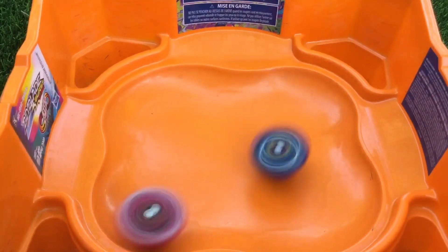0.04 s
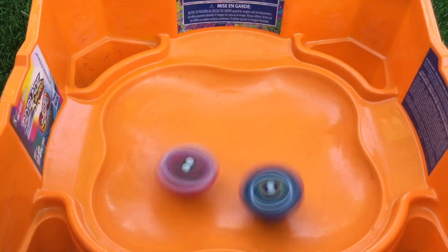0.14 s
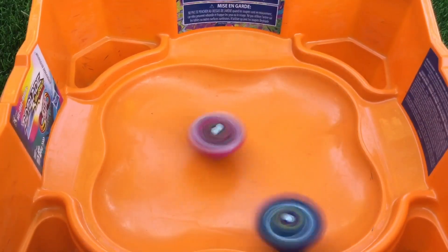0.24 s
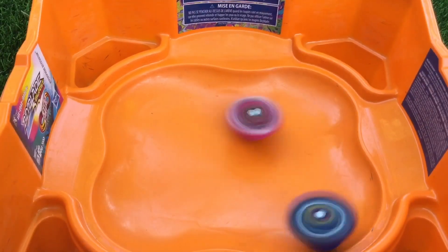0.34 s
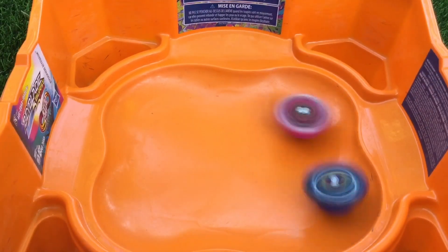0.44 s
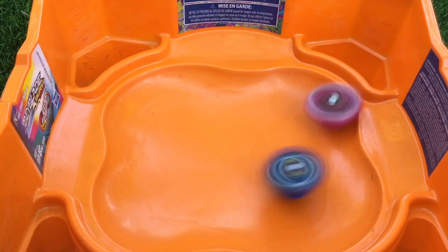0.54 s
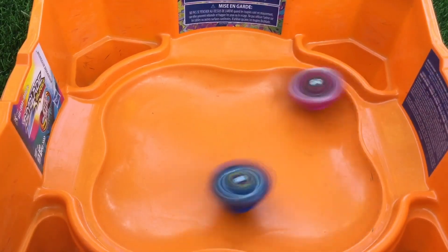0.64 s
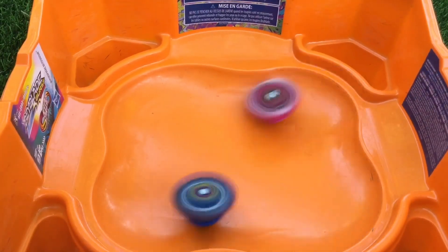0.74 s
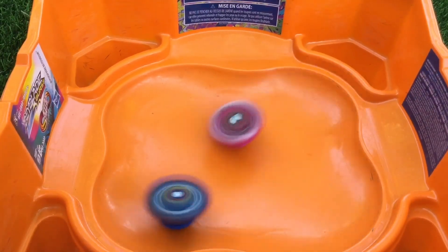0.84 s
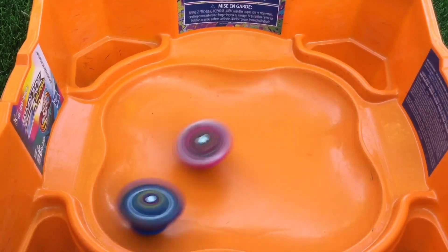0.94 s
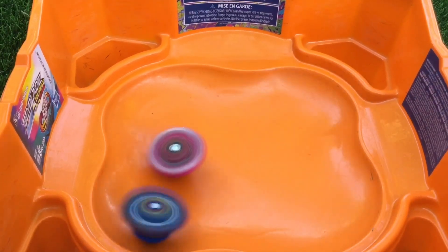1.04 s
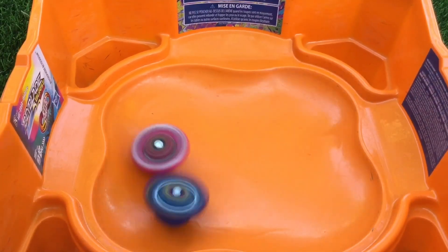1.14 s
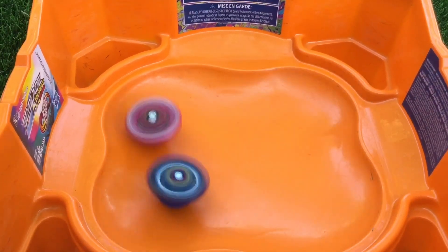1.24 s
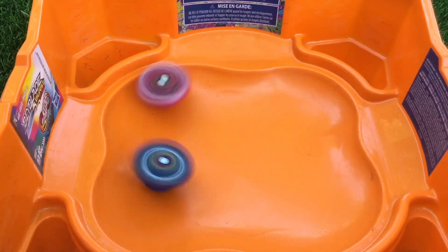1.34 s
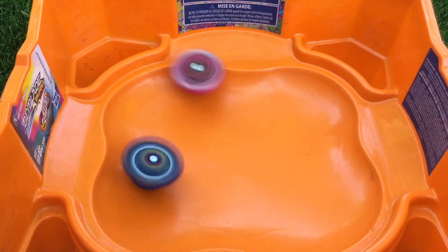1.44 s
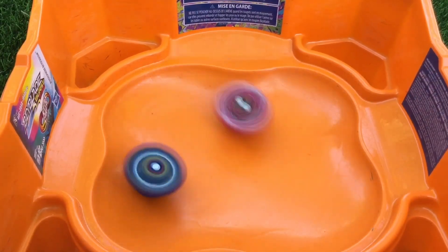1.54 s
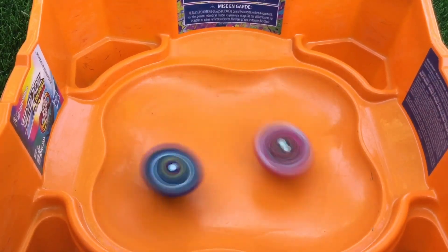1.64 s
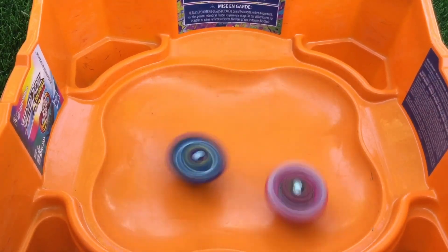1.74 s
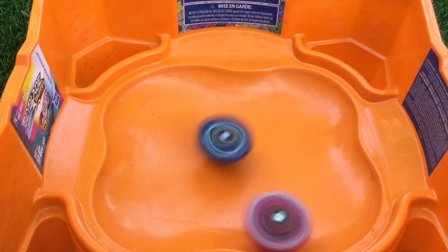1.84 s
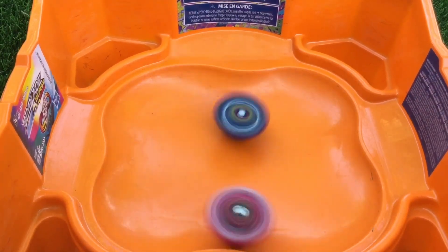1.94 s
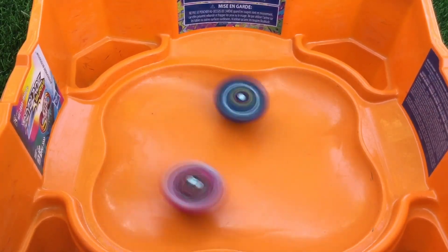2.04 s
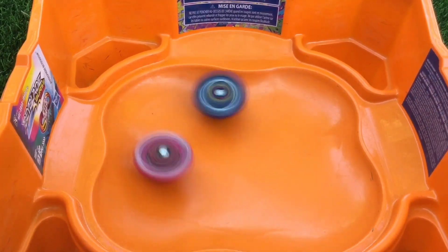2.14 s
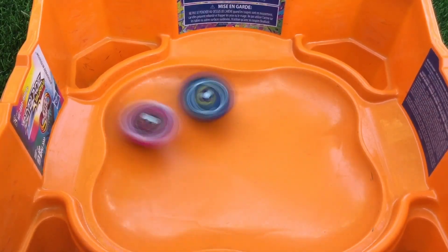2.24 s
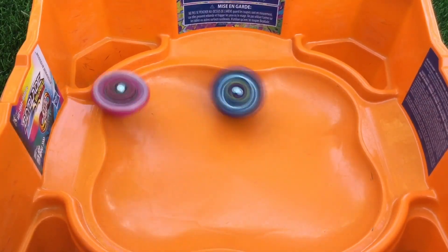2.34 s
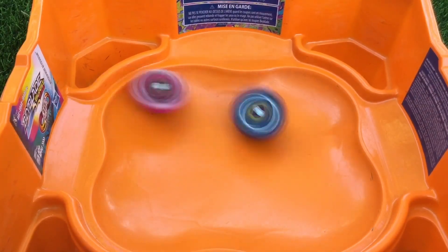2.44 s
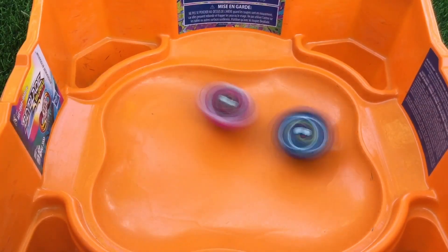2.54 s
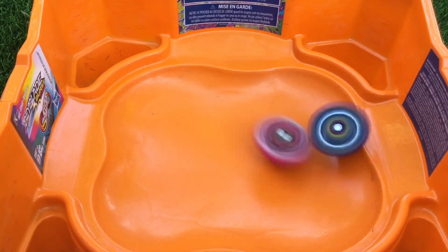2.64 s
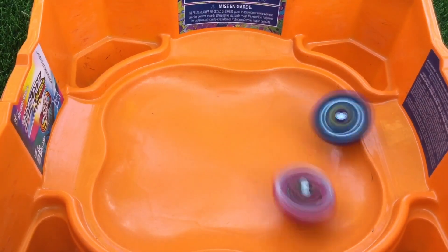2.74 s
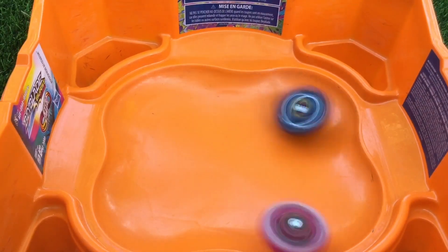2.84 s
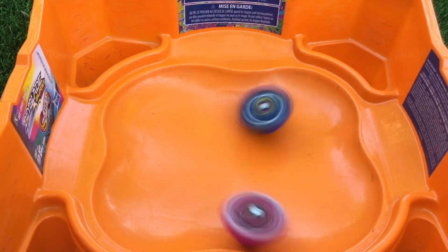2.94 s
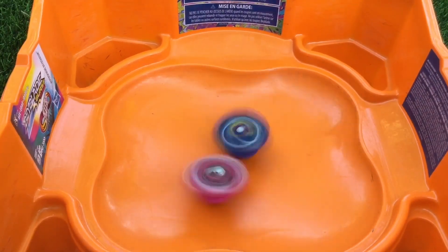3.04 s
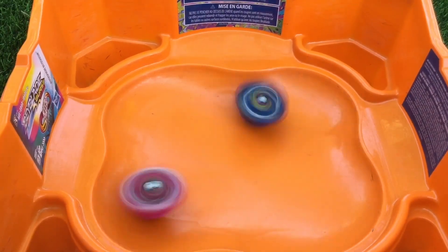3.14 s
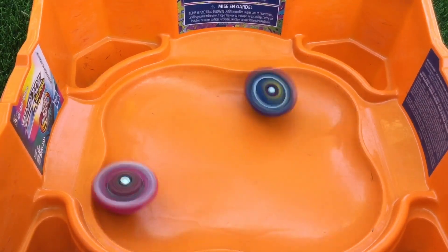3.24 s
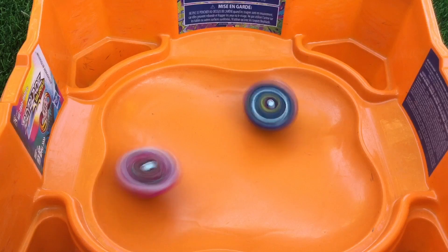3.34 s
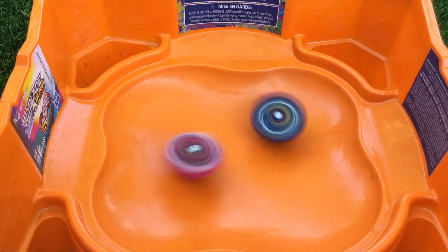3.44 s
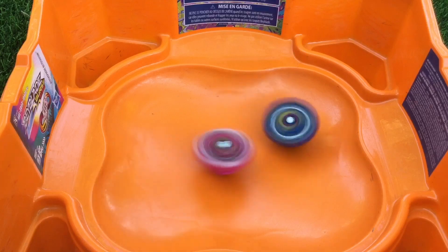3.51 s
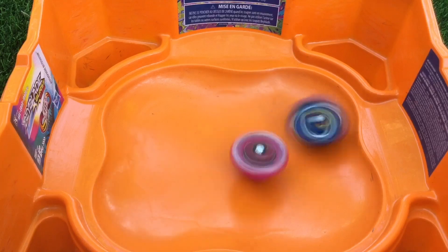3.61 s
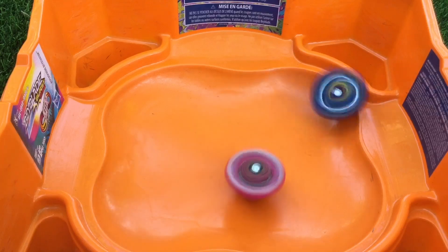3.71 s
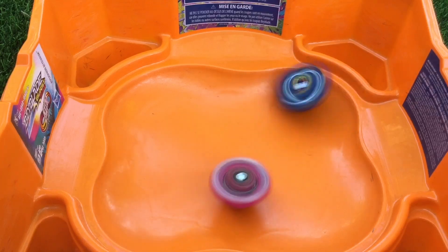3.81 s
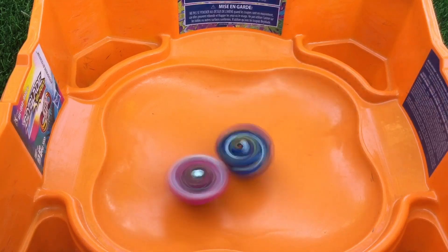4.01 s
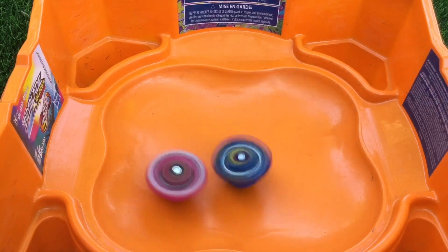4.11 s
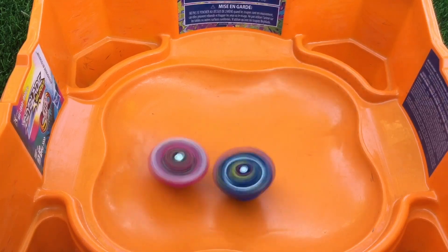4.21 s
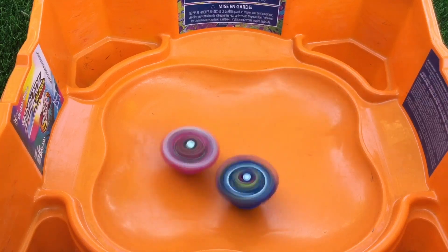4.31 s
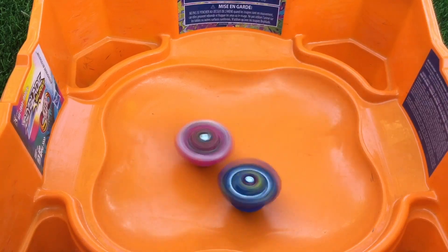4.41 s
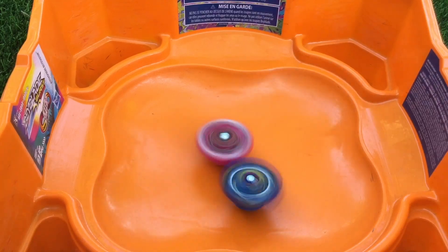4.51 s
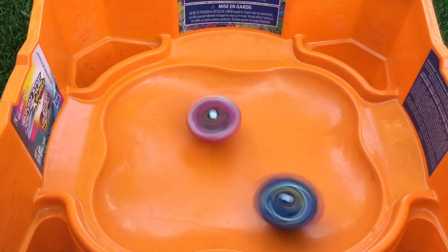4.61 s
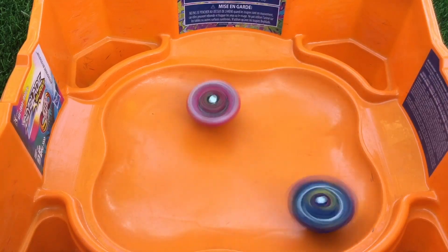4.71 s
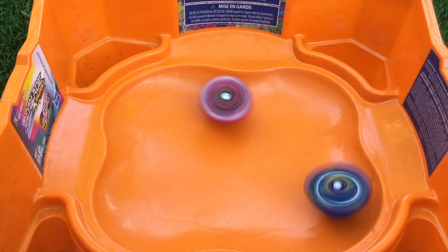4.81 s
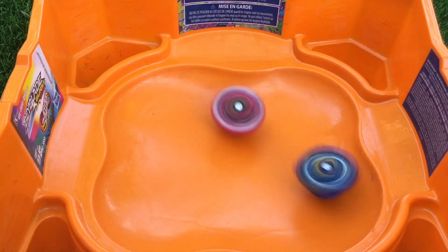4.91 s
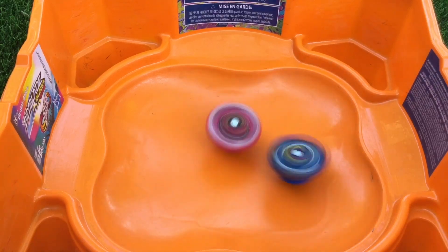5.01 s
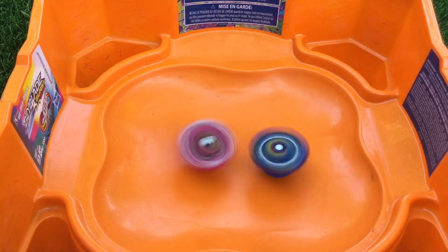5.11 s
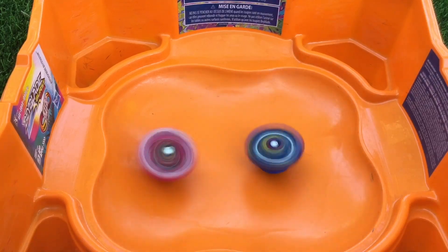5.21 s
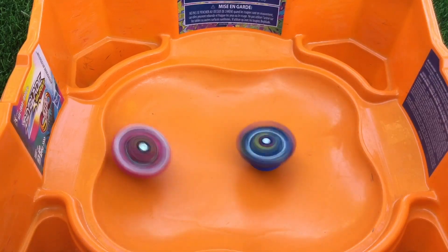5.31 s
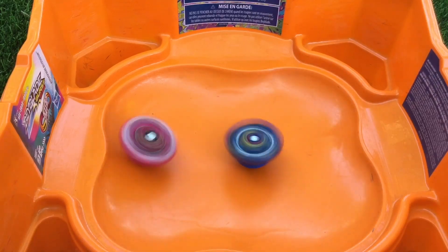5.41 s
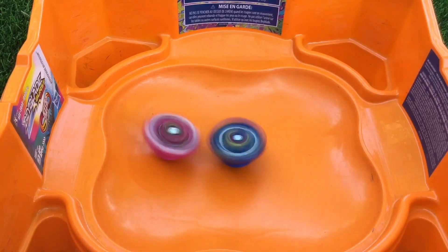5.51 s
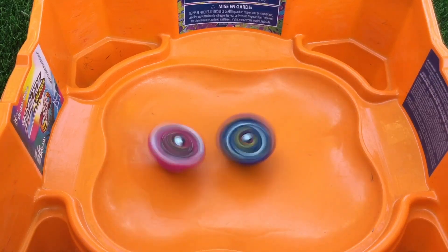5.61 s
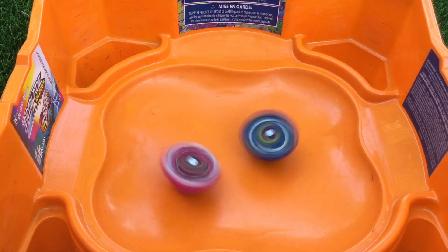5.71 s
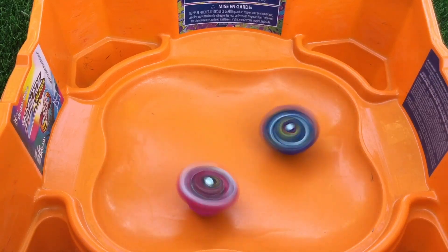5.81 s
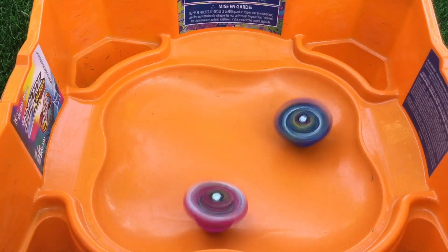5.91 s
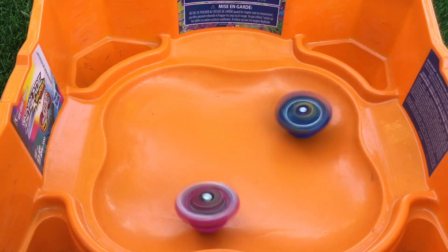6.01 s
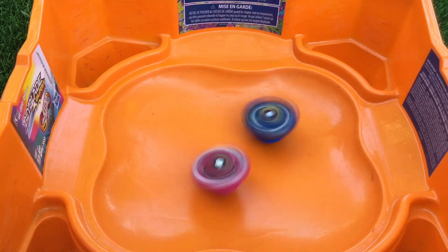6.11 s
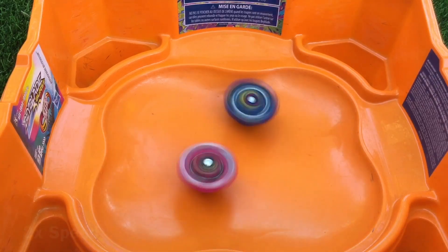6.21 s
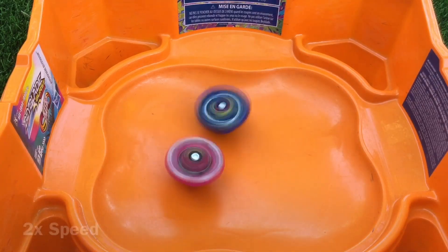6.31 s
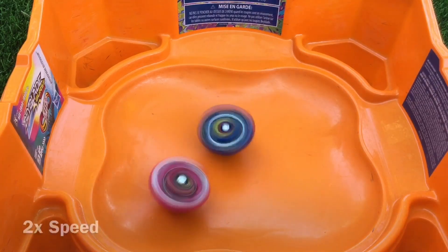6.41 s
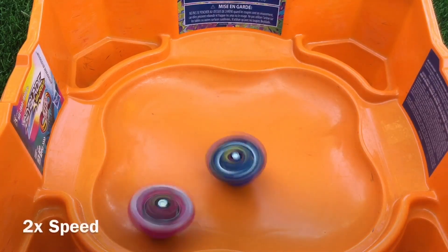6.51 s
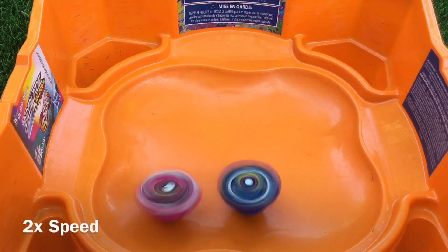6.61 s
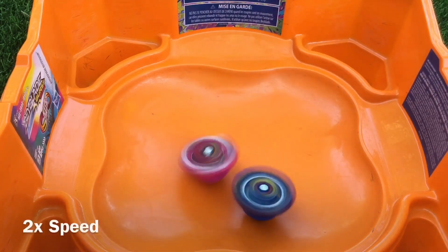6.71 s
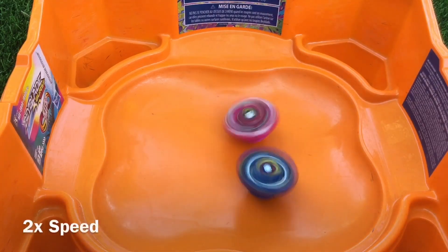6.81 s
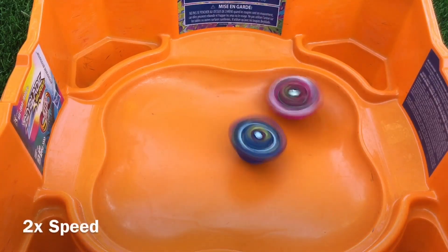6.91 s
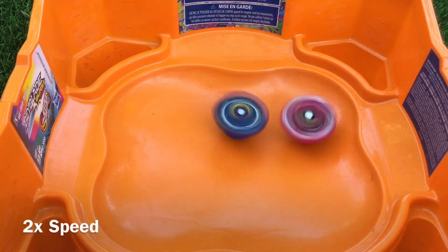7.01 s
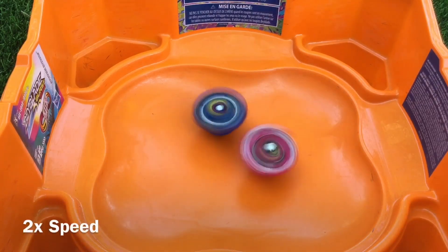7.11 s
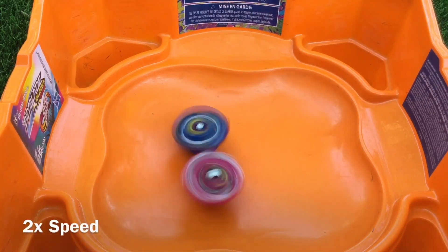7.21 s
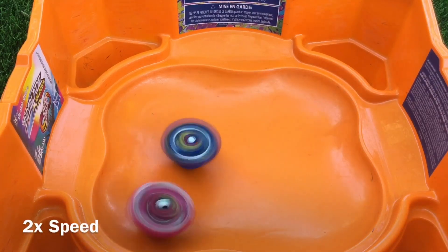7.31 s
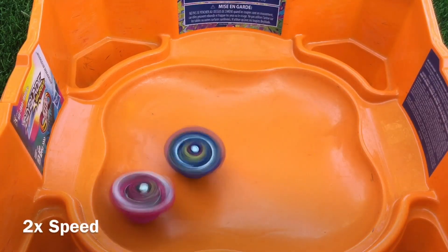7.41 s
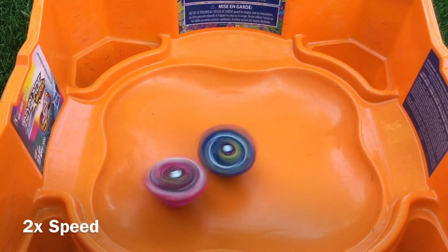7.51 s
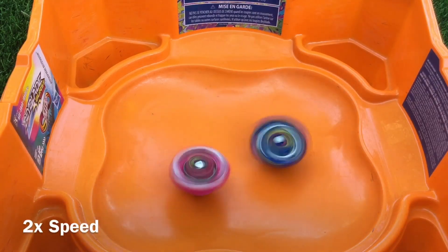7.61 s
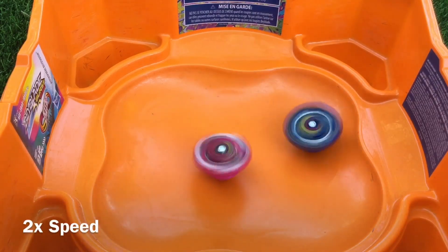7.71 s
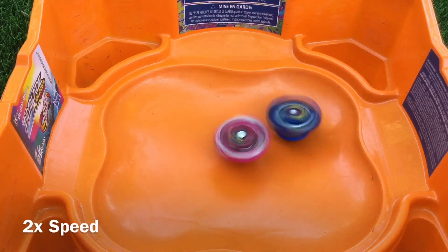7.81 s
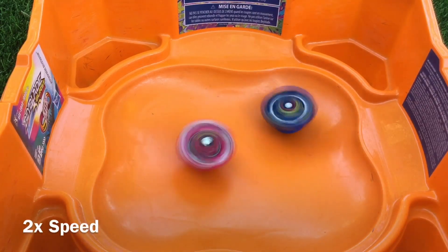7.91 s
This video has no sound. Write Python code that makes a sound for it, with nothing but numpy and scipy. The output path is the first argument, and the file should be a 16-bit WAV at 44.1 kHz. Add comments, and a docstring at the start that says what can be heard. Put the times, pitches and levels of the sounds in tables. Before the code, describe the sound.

Two spinning tops whirr and rasp round a thin plastic bowl, chattering rapidly with each turn. Hollow knocks and clicks come as they hop, and hard plastic cracks with a brief metallic ring as they collide about twice a second. After four seconds the scraping thins out. At six seconds the sound dips, then continues at double speed, higher pitched. Close microphone outdoors, low airy murmur, peaks slightly overloaded.

```python
"""Two spinning tops chatter, hop and clash in a thin plastic bowl outdoors, heard from close by.
Friction noise, gated once a turn, drives the resonances of bowl and discs; impacts are decaying noise
bursts and damped tones; the hum is a periodic rub at the rate of spin; the hiss is filtered noise.
A short echo follows the tops, and the loudest peaks overload the microphone.
After six seconds the sound dips and plays on at double speed, an octave higher."""
import sys
import numpy as np
from scipy import signal
from scipy.fft import rfft, irfft
from scipy.io import wavfile
from scipy.ndimage import uniform_filter1d

SR = 44100
rng = np.random.default_rng(int(sys.argv[2]) if len(sys.argv) > 2 else 0)


def unload_wav(signal):
    """Save mono or channel-first audio to the path in sys.argv[1] as 16-bit WAV at rate SR, clipped to [-1, 1]."""
    wavfile.write(
        sys.argv[1],
        SR,
        np.round(np.clip(np.atleast_2d(signal).T, -1, 1) * 32767).astype(np.int16),
    )


N = 350595

# The action is made at normal speed; its end is sped up last, which doubles the pitches and rates there.
# Table times are as heard, and table levels are relative: the functions add their own gains.
FAST_FROM = 6.003  # s
CUT = round(FAST_FROM * SR)
SIZE = 2 * N - CUT  # samples of action
TIME = np.arange(SIZE) / SR  # s of action


def amp(db):
    """Level to amplitude: 20 dB is a factor of ten."""
    return 10 ** (np.asarray(db) / 20)


def evened(x):
    """Normalization to an rms of 1."""
    return x / np.sqrt(np.mean(x ** 2) + 1e-20)


def action_time(s):
    """Time scaling: the moment of the action that is heard at s."""
    return s + np.maximum(s - FAST_FROM, 0)


def curves(rows):
    """Linear interpolation: one value a sample for every column after the time."""
    s, *columns = np.transpose(rows)
    return [np.interp(TIME, action_time(s), column) for column in columns]


def add(mix, s, sound):
    """Superposition: adds a sound so that it is heard at s."""
    start = max(round(action_time(s) * SR), 0)
    part = mix[start:][:len(sound)]
    part += sound[:len(part)]


def drift(size):
    """Low-pass randomness: noise of rms 1, averaged twice over size samples."""
    once = uniform_filter1d(rng.standard_normal(SIZE), size)
    return evened(uniform_filter1d(once, size))


def coloured(x, points, size=4096):
    """Minimum-phase filtering to a spectrum, with unit energy so that white noise keeps its level."""
    hz, db = np.transpose(points)
    f = abs(np.fft.fftfreq(size, 1 / SR))
    log_gain = np.log(amp(np.interp(np.log(f + 1), np.log(hz), db)))
    spectrum = np.exp(np.conj(signal.hilbert(log_gain)))
    response = np.fft.ifft(spectrum).real[:size // 2]
    return signal.oaconvolve(x, response / np.linalg.norm(response))[:SIZE]


def dying(t, t60):
    """Exponential damping: a fall of 60 dB in t60 seconds."""
    return np.exp(-np.log(1000) * t / t60)


def ring(x, modes, size=8192):
    """Modal synthesis: x drives a sum of damped resonances."""
    t = TIME[:size]
    response = np.zeros(size)
    for hz, db, t60 in modes:
        tone = dying(t, t60) * np.sin(2 * np.pi * hz * t)
        response += amp(db) * tone / np.linalg.norm(tone)
    return signal.oaconvolve(x, response)[:SIZE]


def crack(t60, rattle_db, rattle_t60, rise=0.00017, size=4096):
    """Impact noise: a dense burst, outlasted by the weaker, lumpy rattle of the top's loose parts."""
    t = TIME[:size]
    slow_noise = evened(uniform_filter1d(rng.standard_normal(size), size=200))
    lumps = evened(np.exp(1.44 * slow_noise))
    rattle = amp(rattle_db) * lumps * dying(t, rattle_t60)
    onset = 1 - np.exp(-t / rise)
    return rng.standard_normal(size) * (dying(t, t60) + rattle) * onset


def shifting(x, depth_db, size=256, count=5):
    """Position-dependent excitation: a moving top gives patches of gain in time and frequency."""
    z = signal.stft(x, nperseg=size)[2]
    across_frequency = uniform_filter1d(rng.standard_normal(z.shape), 3, 0)
    patches = evened(uniform_filter1d(across_frequency, count, 1))
    gain = evened(amp(depth_db * np.clip(patches, -2.5, 1.7)))
    return signal.istft(z * gain, nperseg=size)[1][:SIZE]


def swell(s, half, squareness=2.37):
    """Bell-shaped envelope that peaks at 1; a squareness above 2 flattens its top."""
    width = action_time(s + half) - action_time(s)
    return np.exp(-(abs(TIME - action_time(s)) / width) ** squareness)


def swells(rows):
    """Superposed envelopes of events (peak time [s], half length [s], level [dB])."""
    return sum(amp(db) * swell(s, half) for s, half, db in rows)


def chatter(spin, uneven_db, contact=0.43, alike=0.49, grit_db=2, size=1024):
    """Amplitude-modulated friction: a tip scrapes for part of each turn, with a partly repeated scratch."""
    turns = np.cumsum(spin) / SR + rng.random()
    turn, angle = turns.astype(int), turns % 1
    # another force at every turn
    bite = amp(uneven_db * np.clip(rng.standard_normal(size), -2, 1)[turn])
    since_turn = (angle / spin * SR).astype(int)  # samples
    scratch = rng.standard_normal(2 * size)[np.minimum(since_turn, 2 * size - 1)]
    grit = amp(grit_db * evened(uniform_filter1d(rng.standard_normal(SIZE), size=90)))
    # between scrapes the tip barely touches
    touch = .1 + np.minimum(angle / .05, 1) * np.exp(-(angle / contact) ** 2)
    pressure = bite * grit * touch
    pressure /= np.sqrt(uniform_filter1d(pressure ** 2, size=3000))
    # alike is the share of power that repeats
    return pressure * (np.sqrt(alike) * scratch + np.sqrt(1 - alike) * rng.standard_normal(SIZE))


# rates of rotation: (time [s], faster top [turns/s], slower top [turns/s])
SPIN = [(0, 61, 52.7), (0.7, 63.6, 44), (0.93, 66.3, 53), (1.0, 62.5, 49.5), (1.1, 62, 43),
        (1.4, 59.5, 43.1), (4.3, 48.5, 36.2), (8, 29.3, 24.7)]
# how hard the tips run over the plastic; the tops settle after four seconds: (time [s], level [dB])
PACE = [(0, -33.5), (.41, -42), (.76, -32.5), (.87, -43.5), (.96, -34.5), (1.36, -37.5), (1.55, -40),
        (1.82, -29), (2.13, -44), (2.3, -33.5), (2.52, -35.5), (2.9, -33.5), (3.28, -32.5), (3.5, -46),
        (3.72, -35), (4.15, -54), (4.85, -58.5), (5.3, -50.5), (5.7, -55.5), (6.06, -42.5), (6.18, -56),
        (6.5, -57), (7.25, -61.5), (7.95, -56.5)]
# a top swings round the bowl and shakes it:
# (peak time [s], half length [s], rumble of the floor [dB], drumming of the wall [dB])
SWEEPS = [(0.0, 0.041, -21, -21.5), (0.248, 0.092, -25.5, -37.5), (0.61, 0.23, -36, -35.5),
          (1.014, 0.14, -44, -36.5), (1.339, 0.1, -27, -28), (1.82, 0.12, -33, -33),
          (2.283, .11, -32.5, -35.5), (2.713, 0.19, -34, -29), (3.21, 0.081, -41.5, -40.5),
          (3.694, 0.082, -36.5, -35), (5.301, 0.078, -40, -38), (6.76, 0.1, -42, -41.5),
          (7.2, 0.15, -41.5, -44)]
# spectra of the scraping tip, the bowl's floor and its wall: (frequency [Hz], density [dB per Hz])
RASP_SPECTRUM = [(200, -28), (700, -1.5), (1200, -15), (1900, -5.5), (2400, -12), (3100, -1.5),
                 (3700, -1.5), (5100, 6), (6200, -5), (7300, -16), (8200, -7.5), (10000, -30),
                 (12500, -15.5), (16000, -45.5)]
FLOOR_SPECTRUM = [(40, -33.5), (110, -19.5), (175, 0), (270, -4), (380, 0), (560, -4.5), (750, -31),
                  (1500, -39), (4000, -80)]
WALL_SPECTRUM = [(200, -20), (450, 3.5), (550, 10), (660, 1), (810, -1), (950, -1), (1130, -16.5),
                 (1500, -10.5), (2300, -19), (5000, -31)]
# resonances of a top's metal disc: (frequency [Hz], level [dB], t60 [s])
DISC_MODES = [(2146, -26.5, 0.027), (3237, -15, 0.03), (4230, -18.5, 0.043), (4650, -23, 0.15),
              (4460, -41, .05), (5344, -26, .05), (6070, -33, .05), (8210, -24, .04)]


def tips(drum_db=-2.0, rasp_db=-2.0, disc_db=-6, pace_floor_db=-5, pace_wall_db=-8, sweep_rasp_db=-8):
    """Friction-driven vibration: both tips rasp with their pace and shake the bowl, most in the sweeps."""
    # the scatter from turn to turn shrinks with time
    uneven_db = 4 - 0.24 * TIME
    slower_share = 0.38  # of the power
    fast, slow = (chatter(spin, uneven_db) for spin in curves(SPIN))
    force = np.sqrt(1 - slower_share) * fast + np.sqrt(slower_share) * slow
    pace, = curves(PACE)
    rumble = amp(pace + pace_floor_db) + swells((s, half, db) for s, half, db, _ in SWEEPS)
    drum = amp(pace + pace_wall_db) + swells((s, half, db) for s, half, _, db in SWEEPS)
    floor = coloured(force * rumble, FLOOR_SPECTRUM)
    wall = coloured(force * drum * amp(drum_db), WALL_SPECTRUM)
    rub = force * np.hypot(amp(pace + rasp_db), drum * amp(sweep_rasp_db))
    rasp = coloured(rub, RASP_SPECTRUM)
    scrape = rasp + amp(disc_db) * ring(rasp, DISC_MODES)
    return shifting(floor + wall, depth_db=1.5, size=512) + shifting(scrape, depth_db=7.0)


# spectrum of the open air: (frequency [Hz], density [dB per Hz])
OUTDOOR_SPECTRUM = [(20, -50.5), (40, -22), (56, 1), (130, 5), (200, -1.5), (300, -8), (500, -13.5),
                    (900, -21.5), (1200, -28), (2400, -37), (6000, -51.5), (16000, -52.5)]


def outdoors(level_db=-40.0):
    """Stationary filtered noise: the low, steady murmur of the open air."""
    return amp(level_db) * coloured(rng.standard_normal(SIZE), OUTDOOR_SPECTRUM)


def knocked(settle_s=0.057):
    """Exponential relaxation: each clash sets the strength of the ticking anew, which then settles."""
    off_balance = np.zeros(SIZE)
    for s, *_, ticking_db in CLASHES:
        start = round(action_time(s) * SR)
        off_balance[start:] = amp(ticking_db) * np.exp(-TIME[:SIZE - start] / settle_s)
    return off_balance


# spectrum of a tick: (frequency [Hz], density [dB per Hz])
TICK_SPECTRUM = [(1000, -19), (1850, -26), (2130, -7), (2400, -31), (3000, -9.5), (4500, -4.5), (5200, -9),
                 (7000, -41.5)]
# what each tick of a wobbling top rings with: (frequency [Hz], level [dB], t60 [s])
PING_MODES = [(2096, -5.5, 0.045), (4300, -5.5, 0.03)]


def wobble(gain_db=-3, steady_db=-65, come_and_go_db=5, tick_t60=0.0086, scatter_db=3, size=1024):
    """Periodic impulses: the slower disc ticks and pings once a turn, after clashes and faintly between."""
    spin = curves(SPIN)[1]
    turns = np.cumsum(spin) / SR
    strength = amp(scatter_db * rng.standard_normal(size))[turns.astype(int)]
    tick = strength * dying(turns % 1 / spin, tick_t60)
    level = amp(gain_db) * knocked() + amp(steady_db + come_and_go_db * drift(size=4000))
    force = evened(tick * rng.standard_normal(SIZE)) * level
    return shifting(coloured(force, TICK_SPECTRUM), depth_db=2.5) + ring(force, PING_MODES)


def skips(count=200, per_s=15, click_db=4, boom_db=-5.5, scatter_db=2, low_hz=324, high_hz=814):
    """Random impacts: small hops at loosely spaced moments, as strong as the pace, in rows like HOPS."""
    gap, click, boom, patch = rng.random((count, 4)).T
    s = np.cumsum(.5 + gap) / per_s
    pace = np.interp(s, *np.transpose(PACE))
    clicks = pace + click_db + scatter_db * (2 * click - 1)
    booms = pace + boom_db + scatter_db * (2 * boom - 1)
    pitches = low_hz * (high_hz / low_hz) ** patch
    return list(zip(s, clicks, booms, pitches))


# a top lands hard on the bowl or strikes its wall:
# (time [s], click [dB], boom of the bowl [dB], pitch of that patch of bowl [Hz])
HOPS = [(0.118, -27.5, -46, 330), (0.158, -29, -50, 370), (0.239, -39, -23.5, 385), (0.285, -42, -38, 360),
        (0.324, -36, -28.5, 376), (0.451, -28.5, -24.5, 920), (0.4837, -22, -14, 1870),
        (0.52, -32.5, -21.5, 560), (0.561, -28, -32, 620), (0.598, -44, -23, 426), (1.278, -31, -30, 334),
        (1.375, -29, -19.5, 806), (1.406, -41, -22.5, 826), (1.427, -28.5, -28, 800),
        (1.471, -30, -28.5, 660), (1.553, -29.5, -37.5, 324), (1.866, -37, -26.5, 550),
        (1.894, -24, -19.5, 482), (1.938, -21, -28.5, 540), (1.971, -24.5, -24, 580),
        (2.056, -27, -38.5, 905), (2.188, -25.5, -44, 343), (2.269, -28, -24, 830), (2.28, -32, -8.5, 791),
        (2.32, -18.5, -16, 790), (2.335, -23.5, -29.5, 810), (2.362, -25.5, -23.5, 530),
        (2.688, -34, -10.5, 755), (2.724, -29, -16, 850), (2.855, -29, -14, 918), (2.887, -25.5, -9.5, 540),
        (2.93, -27, -28.5, 522), (2.952, -24, -37.5, 1010), (3.393, -28.5, -55, 320),
        (3.728, -27, -32, 357), (3.807, -42, -47, 417), (3.844, -29.5, -44, 387), (4.089, -36.5, -58, 332),
        (4.572, -31.5, -55, 620), (6.253, -32, -56, 430.2)]
# the bowl's lowest resonances: (frequency [Hz], level [dB], t60 [s])
BOWL_MODES = [(179, -28, 0.089), (403, -23, .02), (537, -10.5, 0.038), (902, -6.5, 0.02),
              (1308, -16.5, 0.021), (1610, -16.5, 0.012), (1844, -19.5, 0.022), (2650, -20, 0.024)]


def hops(click_db=8.5, boom_db=5, boom_t60=0.045, rise=0.00056, body_db=-1.0, size=6000):
    """Impact excitation: each landing clicks in the top and booms in the patch of bowl under it."""
    clicks, booms, pushes = np.zeros(SIZE), np.zeros(SIZE), np.zeros(SIZE)
    t = TIME[:size]
    envelope = dying(t, boom_t60) * (1 - np.exp(-t / rise))
    for s, click, boom, hz in HOPS + skips():
        add(clicks, s, amp(click + click_db) * crack(t60=0.026, rattle_db=-20, rattle_t60=0.12))
        add(booms, s, amp(boom + boom_db) * np.sin(2 * np.pi * hz * t) * envelope)
        push = crack(t60=0.029, rattle_db=-13, rattle_t60=0.11)
        add(pushes, s, amp(boom + boom_db + body_db) * push)
    bowl = booms + shifting(ring(pushes, BOWL_MODES), depth_db=6, size=512)
    # a small thin shell radiates no deep bass
    bowl = signal.sosfilt(signal.butter(2, 170, "highpass", fs=SR, output="sos"), bowl)
    return shifting(coloured(clicks, RASP_SPECTRUM), depth_db=4.0) + bowl


# rim against rim, two strikes in quick succession: (time [s], first strike [dB], gap in the action [s],
# second strike [dB], ticking of the top knocked off balance [dB])
CLASHES = [(0.474, -1, .0094, -6, -37), (1.1254, -9.5, 0.015, -8.5, -29),
           (2.2038, -0.5, 0.0018, -25, -36.5), (2.6363, -3.5, .011, -4.5, -41),
           (3.012, -8.5, 0.01, -0.5, -30), (3.5584, -14.5, 0.012, -1.5, -41.5), (3.974, -3, .01, -10, -27),
           (4.494, -2.5, 0.0022, -17, -42.5), (5.039, -13, 0.0097, -6.5, -37),
           (5.5127, -5, 0.0081, -17, -40), (5.527, -10, .011, -11, -38), (6.118, -3.5, 0.0022, -25, -61),
           (6.3203, -6, .006, -9, -29.5), (7.2045, -22, .027, -11, -35), (7.4192, -13, 0.0047, -14, -60),
           (7.526, -11.5, 0.014, -18.5, -51), (7.793, -9.5, .011, -28, -48)]
# spectrum of a strike: (frequency [Hz], density [dB per Hz])
CLASH_SPECTRUM = [(60, -39), (200, -15), (800, -18.5), (1250, -27.5), (1980, -15), (2450, -22),
                  (3200, -12.5), (3700, -9.5), (5200, 3.5), (7200, -13.5), (8100, -8), (9700, -21.5),
                  (12500, -12.5), (16000, -35)]


def clashes(gain_db=4, ring_db=-1):
    """Collision and free vibration: the rims strike with a hard plastic crack and the discs ring briefly."""
    force = np.zeros(SIZE)
    for s, first_db, gap, second_db, _ in CLASHES:
        for delay, db in (0, first_db), (gap, second_db):
            strike = amp(db + gain_db) * crack(t60=0.028, rattle_db=-17.5, rattle_t60=0.094)
            add(force, s, np.pad(strike, (round(delay * SR), 0)))
    cracks = coloured(force, CLASH_SPECTRUM)
    return shifting(cracks + amp(ring_db) * ring(force, DISC_MODES), depth_db=3.0)


# the faster top runs true and hums: (peak time [s], half length [s], level [dB])
WHIRRS = [(0.76, .075, -30.5), (1.06, 0.14, -28)]
# spectrum that the bowl gives the hum: (frequency [Hz], density [dB per Hz])
WHIRR_SPECTRUM = [(300, -17), (640, -37), (750, 5.5), (815, 7.5), (880, -4.5), (1130, -19.5), (1520, -8),
                  (1900, -21), (2350, -13), (2600, -15), (2950, -6), (3500, -14), (5000, -21), (7000, -29),
                  (15000, -32.5)]


def whirr(contact=0.41, waver=0.0063, flutter_db=1.5, size=4096, count=250):
    """Harmonic series: one rub repeats every turn, so harmonics of the spin sound, coloured by the bowl."""
    # the pitch wavers by a small share, and the level flutters
    spin = curves(SPIN)[0] * (1 + waver * drift(size=1800))
    flutter = amp(flutter_db * drift(size=150))
    angle = np.cumsum(spin) / SR % 1
    grid = np.arange(size) / size
    # the tip grips at once and lets go before the turn ends; this sets the phases
    grip = rng.standard_normal(size) * np.exp(-(grid / contact) ** 4)
    harmonics = rfft(grip)[1:count]
    # the rub feeds all harmonics equally, so the bowl alone sets the tone
    rub = irfft(np.append(0, harmonics / abs(harmonics)), size)
    hum = coloured(flutter * np.interp(angle, grid, rub), WHIRR_SPECTRUM)
    return swells(WHIRRS) * evened(hum)


# a tip skids and the bowl sings briefly:
# (peak time [s], half length in the action [s], level [dB], resonance [Hz])
SKIDS = [(1.309, 0.047, -50, 175.2), (1.79, 0.051, -34, 192.2), (2.224, 0.017, -23, 547),
         (3.234, 0.088, -34, 499.3), (5.319, 0.03, -32.5, 564), (5.323, 0.025, -44.5, 860),
         (7.045, 0.043, -36, 683)]


def skids(width_hz=70):
    """Resonance under friction: noise feeds one mode of the bowl, swelling and fading."""
    out = np.zeros(SIZE)
    for s, half, db, hz in SKIDS:
        envelope = np.exp(-((TIME - action_time(s)) / half) ** 2)
        resonator = signal.iirpeak(hz, hz / width_hz, fs=SR)
        song = signal.lfilter(*resonator, rng.standard_normal(SIZE))
        out += amp(db) * envelope * evened(song)
    return out


# a smooth high hiss swells and fades: (peak time [s], half length [s], level [dB])
HISSES = [(4.29, 0.036, -49), (5.7, 0.29, -39.5), (6.32, 0.054, -41.5), (7.035, 0.04, -32.5),
          (7.73, 0.057, -37)]
# spectrum of the hiss: (frequency [Hz], density [dB per Hz])
HISS_SPECTRUM = [(500, -35), (1500, -20), (2500, -12), (3900, -9), (5100, 2.5), (6100, 1), (7400, -8),
                 (8300, -12.5), (9900, -20.5), (12200, -11), (13800, -13), (16000, -30)]


def hiss(gain_db=-1, disc_db=-1):
    """Resonant filtering of noise: a smooth treble hiss, banded by the resonances of the discs."""
    rub = rng.standard_normal(SIZE)
    noise = coloured(rub, HISS_SPECTRUM) + amp(disc_db) * ring(rub, DISC_MODES)
    return amp(gain_db) * swells(HISSES) * shifting(noise, depth_db=1.0, size=1024, count=25)


def echoes(x, wet_db=-18, t60=0.19, delay=0.01, size=16000):
    """Diffuse reflection: the bowl's high sides and the yard scatter a short tail."""
    t = TIME[:size]
    sparse = rng.standard_normal(size) * (rng.random(size) < .1)
    tail = sparse * dying(t, t60) * np.clip(t / delay - 1, 0, 1)
    return amp(wet_db) * signal.oaconvolve(x, tail / np.linalg.norm(tail))[:SIZE]


def overload(x, ceiling=0.94):
    """Saturation: the microphone flattens the loudest peaks."""
    return x / (1 + (x / ceiling) ** 10) ** (1 / 10)


def speed_up(x, fade_out=0.043, fade_in=0.047):
    """Time compression: fades out, then fades in again at double speed and double frequency."""
    fast = signal.resample_poly(x[CUT:], 1, 2)
    t = TIME[:N] - FAST_FROM
    fade = np.clip(np.maximum(-t / fade_out, t / fade_in), 0, 1)
    return np.concatenate([x[:CUT], fast])[:N] * fade


def scene():
    """Superposition of the tops in their bowl and the open air, then overload and the change of speed."""
    tops = tips() + wobble() + hops() + clashes() + whirr() + skids()
    return speed_up(overload(tops + echoes(tops) + hiss() + outdoors()))[None]


def record(dry, edge_hz=16100):
    """Band limiting: a steep linear-phase low-pass filter."""
    lowpass = signal.firwin(401, edge_hz, window=("kaiser", 7), fs=SR)
    return signal.oaconvolve(dry, lowpass[None], "same")


dry = scene()
out = record(dry)
unload_wav(out)
```